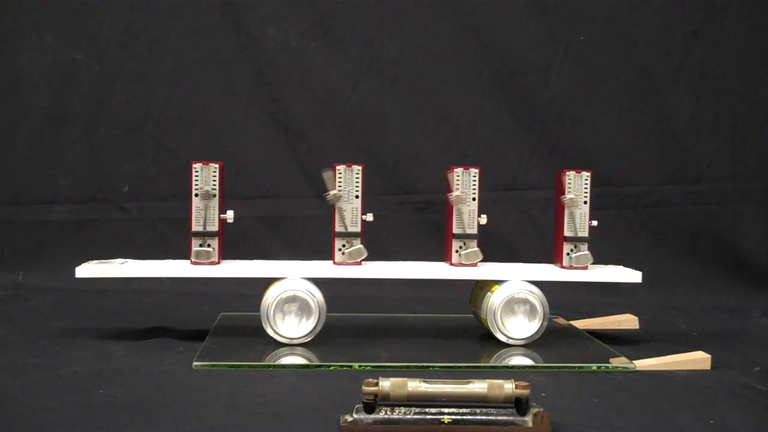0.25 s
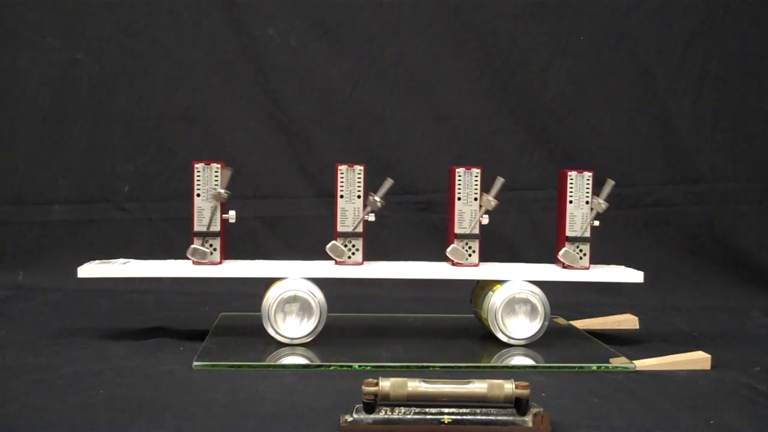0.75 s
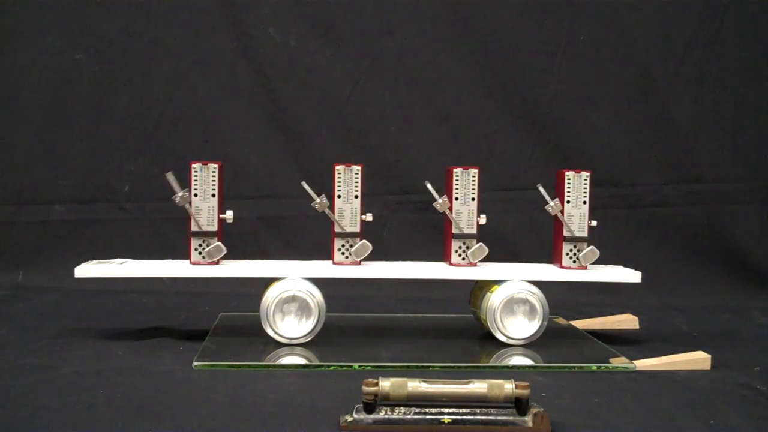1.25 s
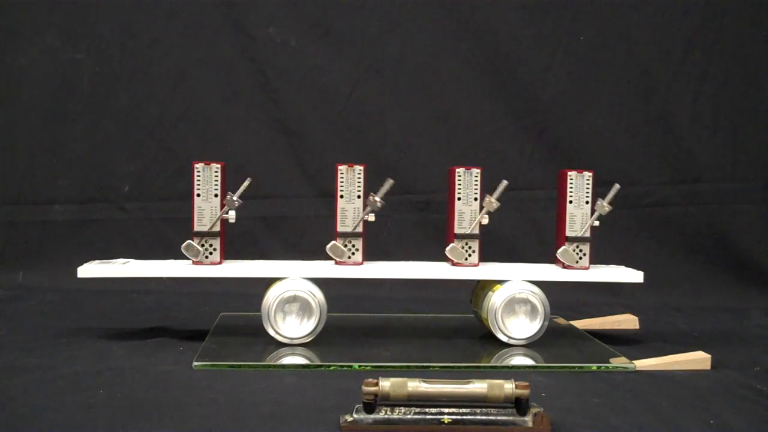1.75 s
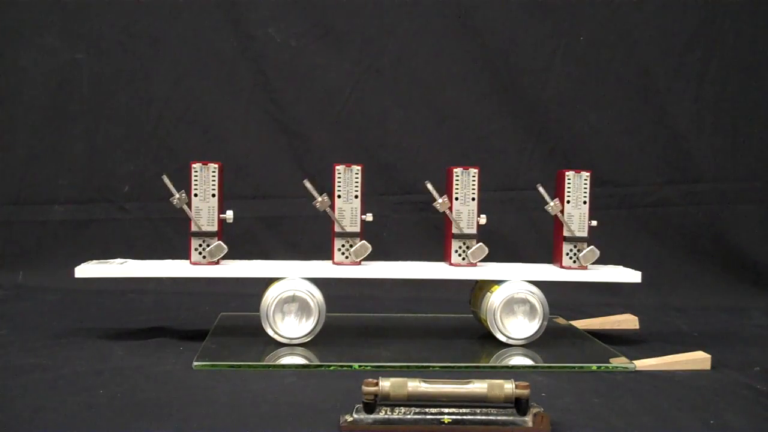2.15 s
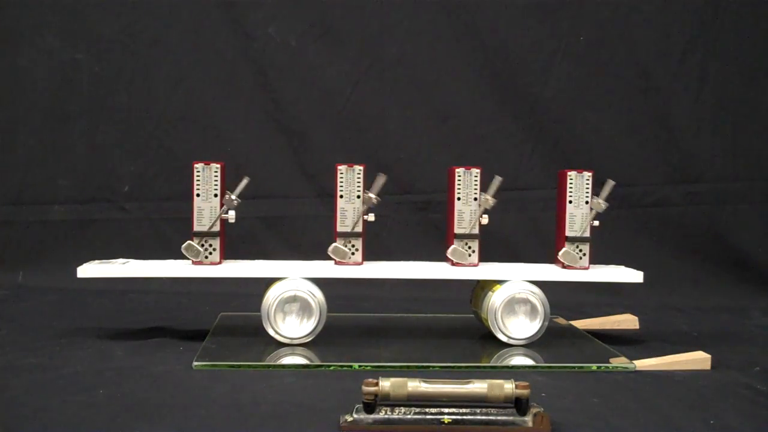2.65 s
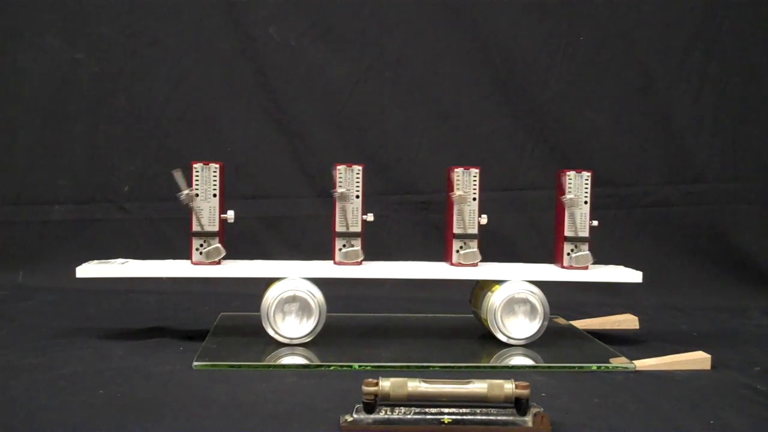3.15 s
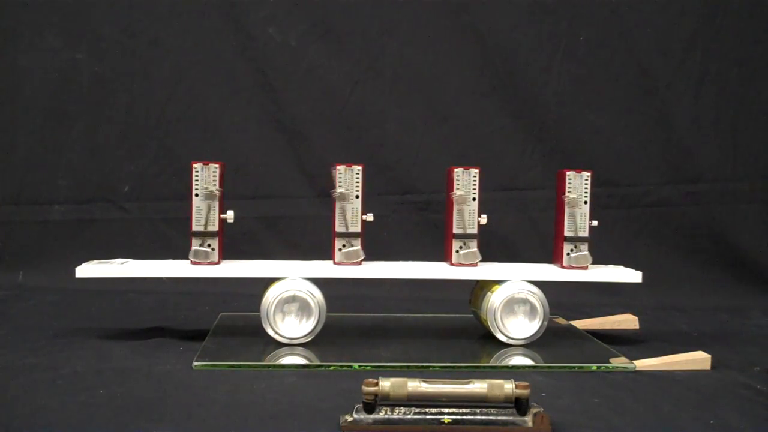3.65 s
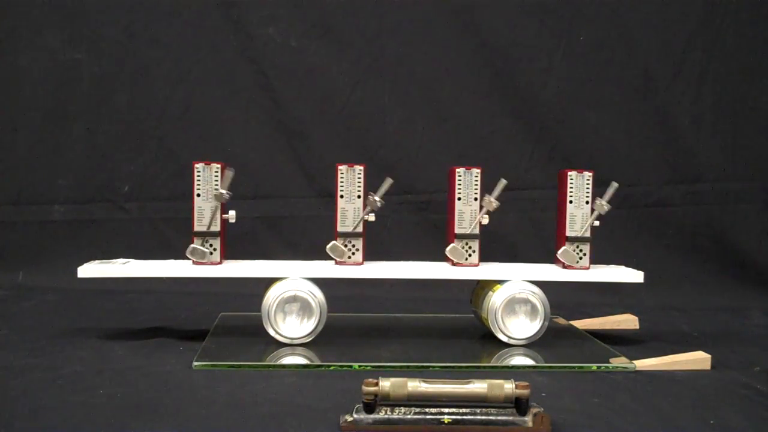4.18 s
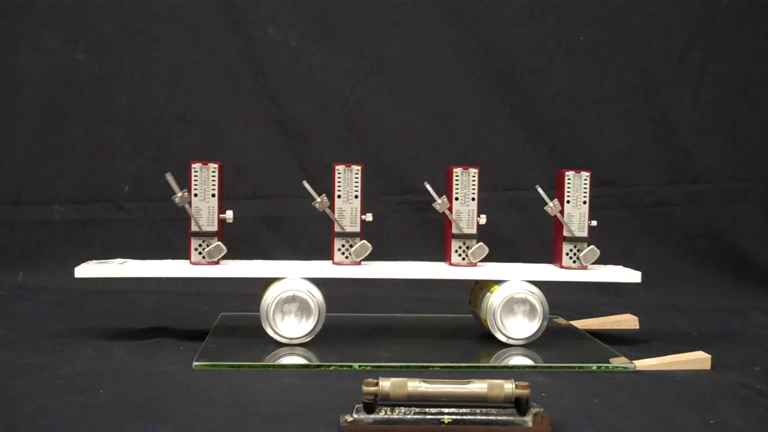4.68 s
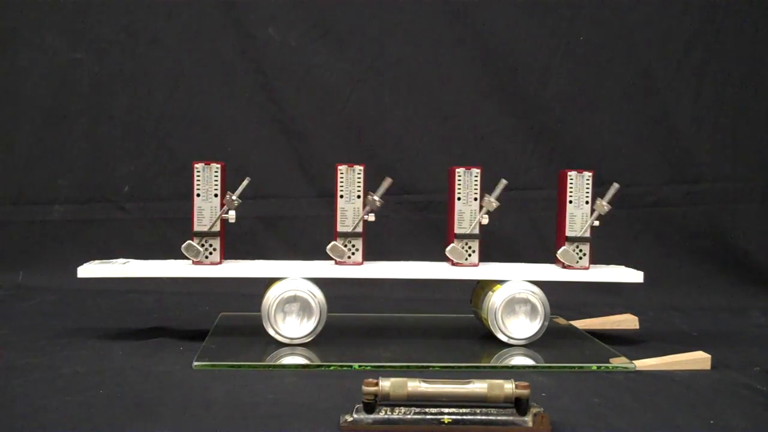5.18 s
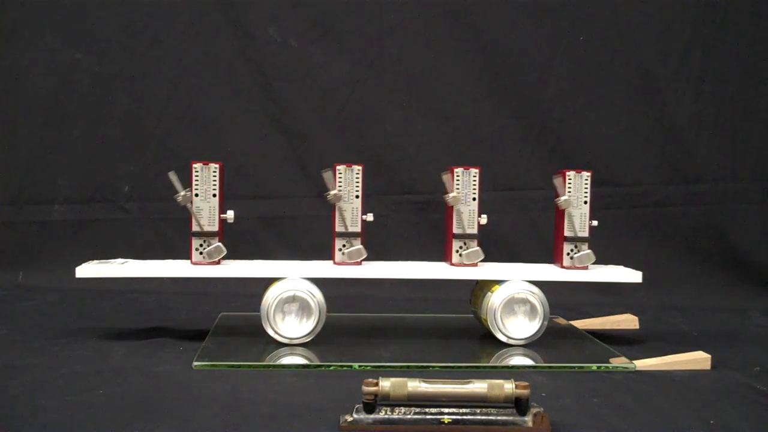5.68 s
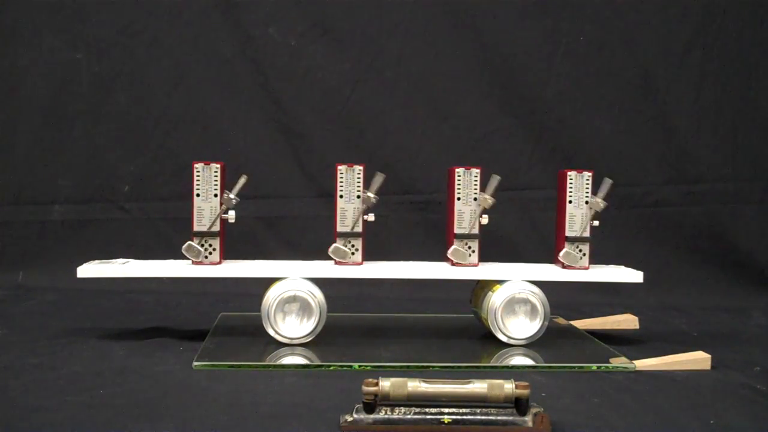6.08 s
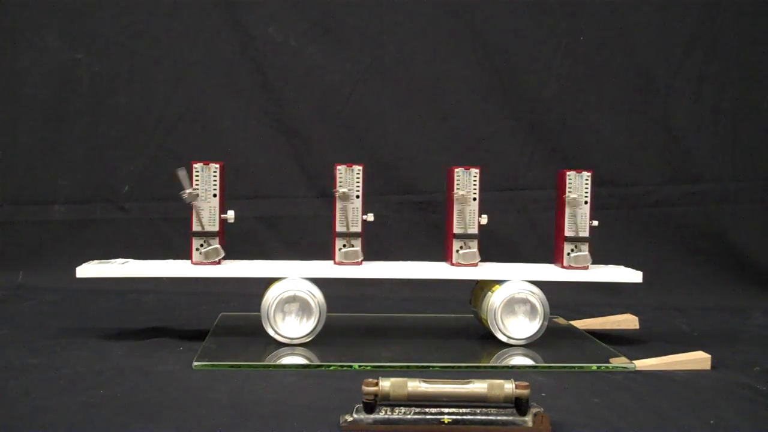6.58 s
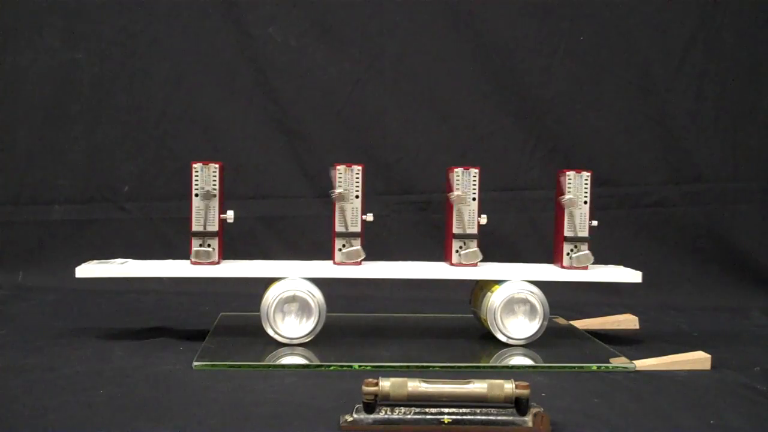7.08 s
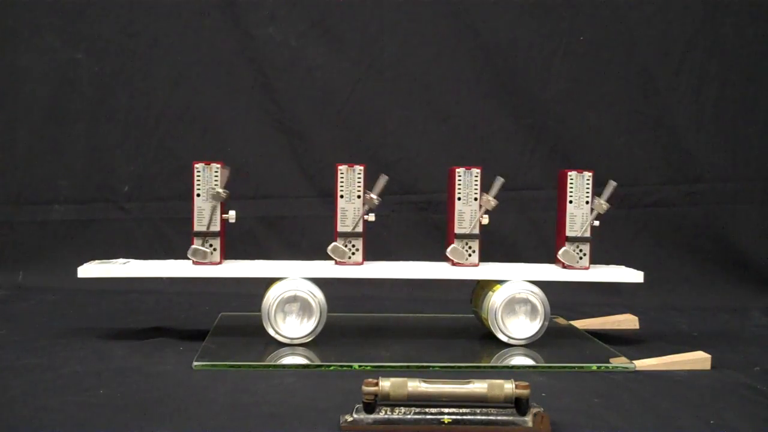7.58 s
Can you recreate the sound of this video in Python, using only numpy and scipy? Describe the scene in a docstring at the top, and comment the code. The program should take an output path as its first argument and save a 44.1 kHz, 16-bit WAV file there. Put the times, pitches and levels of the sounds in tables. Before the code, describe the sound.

Four small clockwork metronomes tick almost in unison, hard bright overloaded clacks in tight clusters, over faint fan hum in a quiet room.

```python
"""Four small clockwork metronomes tick almost together on one board: three in a bunch, one lagging.
Each escapement blow rings the modes of a hollow plastic case with a dry crack; noise bands make the room's
short tail. Behind them lie shaped air noise and two drifting fan whines that beat.
The microphone pair overloads: both channels clip, and the left one pops inside the loudest ticks."""
import sys
import numpy as np
from scipy import signal
from scipy.fft import rfft, irfft
from scipy.io import wavfile
from scipy.ndimage import uniform_filter1d

SR = 44100
rng = np.random.default_rng(int(sys.argv[2]) if len(sys.argv) > 2 else 0)


def transcribe(signal):
    """Save signal, clipped to [-1, 1], as a 16-bit WAV file at the path in sys.argv[1]."""
    frames = np.atleast_2d(signal).T
    limited = np.clip(frames, -1, 1)
    pcm = np.round(limited * 32767).astype(np.int16)
    wavfile.write(sys.argv[1], SR, pcm)


N = 345294
LEAD = SR // 4  # samples of run-up ahead of the scene


def metronomes():
    """The rolling board pulls the pendulums into step, so beat times bend smoothly from swing to swing."""
    # Two rows per metronome, tick and tock: [first swing t/s, fifth swing t/s, ninth swing t/s,
    # level/dB, left minus right level/dB, hollow knock level/dB, case pitch factor]
    clocks = [(0.3294, 3.7597, 7.182, 1.5, 2, 0, 1.01), (0.7539, 4.1857, 7.6118, 1, 1, 0, 1.02),
              (0.3440, 3.7584, 7.1775, 1.5, -1, 0, 0.99), (0.7788, 4.1968, 7.617, 0.5, -4, -2, 0.98),
              (0.3592, 3.7687, 7.1846, -4, 0, -1, 1.03), (0.7825, 4.1958, 7.611, -3, 2, -1, 1.01),
              (0.4207, 3.8426, 7.2542, -0.7, 1, -3, 0.99), (0.8342, 4.2568, 7.6752, -2, 1.3, -3, 1.01)]
    # Swing numbers of the three given times, counted from 0 [swing]
    known_swings = (0, 4, 8)
    wobble_s, uneven_db = .0003, .7  # tooth-to-tooth spread in time and strength
    out = np.zeros((3, N + 2 * LEAD))
    # begin one swing early: the tail of a beat just gone still hangs in the room
    swings = np.arange(-1, known_swings[-1] + 1)
    for *times, level_db, pan_db, knock_db, pitch in clocks:
        beats = np.polyval(np.polyfit(known_swings, times, 2), swings)
        for beat_s in beats[beats > -LEAD / SR]:
            late, strong = rng.standard_normal(2)
            row_db = level_db + uneven_db * strong + pan_db * np.array([[.5], [-.5], [0]])
            one = tick(knock_db, pitch) * undb(row_db)
            at = LEAD + int((beat_s + wobble_s * late) * SR)
            out[:, at:at + one.shape[1]] += one
    return out


def tick(knock_db, pitch):
    """Each contact rings decaying case modes with a crack; rows: left, right, to the walls; left peak 1."""
    # Case and clockwork modes, before pitch factor and detuning: [f/Hz, level/dB]
    case_modes = [(1250, -12.5), (1850, -9), (2200, -9), (2650, -10), (3050, -10), (3720, -9), (4200, -14),
                  (4900, -7), (5300, -7.5), (5700, -8.5), (6100, -3.5), (6500, -6), (6900, -2), (7400, -1),
                  (8000, -4), (8500, -5), (8900, -8.5), (9600, -11.5), (11000, -23), (13600, -29)]
    # Contacts and first echoes inside one tick: [delay t/s, left level/dB, right level/dB]
    blows = [(0, 0, -1), (.00115, 0, 0), (.0033, -10, -12), (.0048, -13, -5), (.0068, -16, -16)]
    hollow_hz, hollow_t60_s, clockwork_t60_s = 2400, .016, .01  # hollow knock lies below hollow_hz
    crack_db, crack_decay_s, contact_s = -2., .0016, .00007  # contact_s softens the onset
    scatter_db, detune = 3., .02  # chance in mode level and, as a fraction, in mode pitch
    small_hz = 1264  # so small a case radiates no bass

    hz, db = np.transpose(case_modes)[:, :, None]
    hollow = hz < hollow_hz
    db = db + knock_db * hollow
    t60 = np.where(hollow, hollow_t60_s, clockwork_t60_s)
    t = np.arange(SR // 25) / SR
    decay = np.exp(-np.log(1000) * t / t60)
    colour = case_modes + [(15000, -55)]
    out = np.zeros((3, len(t) + SR // 50))
    detuned = pitch * hz * (1 + detune * rng.standard_normal(hz.shape))
    sign = (-1) ** np.arange(len(hz))[:, None]  # neighbouring modes swing opposite ways
    for delay_s, left_db, right_db in blows:
        size = sign * undb(db + scatter_db * rng.standard_normal(hz.shape))
        ring = (size * decay * np.sin(2 * np.pi * detuned * t)).sum(axis=0)
        crack = undb(crack_db) * np.exp(-t / crack_decay_s) * shaped(len(t), colour)
        blow = (ring + crack) * (1 - np.exp(-t / contact_s))
        at = int(delay_s * SR)
        out[:2, at:at + len(t)] += undb([[left_db], [right_db]]) * blow
    # summed over all directions the modes blur: the walls get one click of their broad colour
    impulse = np.eye(1, out.shape[1])[0]
    out[2] = port(impulse, colour) * np.abs(out[0]).max()
    out = signal.sosfilt(signal.butter(6, small_hz, "high", fs=SR, output="sos"), out)
    return out / np.abs(out[0]).max()


def linger(click):
    """Twelve close resonances, rung by every tick, hang on as one rough narrow ring."""
    centre_hz, width_hz, level_db, t60_s = 1870, 70, -33, 0.54
    t = np.arange(SR // 2) / SR
    hz = centre_hz + width_hz * rng.standard_normal((12, 1))
    cluster = np.sin(2 * np.pi * hz * t).sum(axis=0) / np.sqrt(len(hz))
    ring = np.exp(-np.log(1000) * t / t60_s) * cluster
    return undb(level_db) * signal.fftconvolve(click, ring)[:len(click)]


def room(dry):
    """Dense echoes build up once the walls are reached and die band by band, unlike at the two ports."""
    # Room tail bands: [f/Hz, 60 dB decay t/s, level/dB]
    tail_bands = [(1080, 0.17, -18), (1930, 0.44, -21.5), (4070, 0.44, -24.5), (6480, 0.39, -27),
                  (8340, 0.12, -57), (11700, 0.096, -35), (14000, .18, -49)]
    gap_s = 0.003  # time scale of the build-up
    t = np.arange(int(.7 * SR)) / SR
    build_up = 1 - np.exp(-(t / gap_s) ** 2)
    wet = []
    for near in dry:
        tail = 0
        for k, (hz, t60, db) in enumerate(tail_bands):
            # noise that peaks at its own band and falls 14 dB by the next
            points = [(row[0], 0 if j == k else -14) for j, row in enumerate(tail_bands)]
            tail = tail + undb(db) * shaped(len(t), points) * np.exp(-np.log(1000) * t / t60)
        wet.append(signal.fftconvolve(near, tail * build_up)[:len(near)])
    return np.array(wet)


def whines():
    """Two fans a few hertz apart: each tone and its octave drift and waver, and together they beat."""
    # Fan pitch over time: [t/s, first fan f/Hz, second fan f/Hz]
    fan_pitch = [(0.45, 682.28, 689.44), (0.95, 682.15, 689.66), (1.45, 681.57, 689.81),
                 (1.95, 681.32, 690.06), (2.45, 681.41, 689.93), (2.95, 681.7, 690.27),
                 (3.45, 681.83, 689.93), (3.95, 682.15, 690.06), (4.45, 682.6, 689.92),
                 (4.95, 682.52, 689.43), (5.45, 682.49, 689.27), (5.95, 682.59, 689.45),
                 (6.45, 682.44, 689.24), (6.95, 682.11, 688.82), (7.45, 681.85, 689.83)]
    tone_db, octave_db = (-51.7, -56.5), (-68., -60.)  # rms per fan, around which the level wavers
    waver_db = .7  # multiplies the slow walk
    in_step_s = .21  # a moment when the two whines add up
    s, *fans = np.transpose(fan_pitch)
    t = np.arange(N) / SR
    out = 0
    for hz, low_db, high_db in zip(fans, tone_db, octave_db):
        phase = 2 * np.pi * np.cumsum(np.interp(t, s, hz)) / SR
        phase = phase - phase[int(in_step_s * SR)]
        tone = undb(low_db + waver_db * walk(3.23)) * np.cos(phase)
        octave = undb(high_db + 2 * waver_db * walk(4.1)) * np.cos(2 * phase)
        out = out + tone + octave
    return np.sqrt(2) * out  # rms to peak


def air():
    """Ventilation rumble, largely alike at both ports, under microphone hiss that is not."""
    # Spectrum of the air noise: [f/Hz, relative density level/dB]
    air_colour = [(25, -22), (60, -10), (110, -8.5), (250, -6.5), (400, 1.5), (550, -4), (800, 1.5),
                  (1000, -5.5), (1900, -5.5), (3000, -13.5), (4500, -16.5), (6300, -14), (7800, -18),
                  (10000, -28), (14000, -28)]
    level_db, alike_hz = -47.5, 1610  # likeness of the ports halves at alike_hz
    mid, side = shaped(N, air_colour), shaped(N, air_colour)
    f = np.fft.rfftfreq(N, 1 / SR)
    # the deepest bass is less alike too
    alike = .93 / (1 + (f / alike_hz) ** 2) * np.clip(f / 110, .4, 1)
    mid = irfft(rfft(mid) * np.sqrt(1 + alike), N)
    side = irfft(rfft(side) * np.sqrt(1 - alike), N)
    return undb(level_db + 0.2 * walk(1.92)) * np.array([mid + side, mid - side]) / np.sqrt(2)


def port(x, points):
    """Causal minimum-phase filter with the gain of (Hz, dB) points, from the folded cepstrum."""
    hz, db = np.transpose(points)
    f = np.maximum(np.fft.rfftfreq(1024, 1 / SR), 1)
    cepstrum = irfft(np.log(undb(np.interp(np.log(f), np.log(hz), db))))
    # fold the second half onto the first
    cepstrum[1:512], cepstrum[513:] = 2 * cepstrum[1:512], 0
    return signal.fftconvolve(x, irfft(np.exp(rfft(cepstrum))))[:len(x)]


def shaped(size, points):
    """Noise with a spectrum of (Hz, dB) points, joined along log frequency, rms 1."""
    hz, db = np.transpose(points)
    f = np.maximum(np.fft.rfftfreq(size, 1 / SR), 1)
    gain = undb(np.interp(np.log(f), np.log(hz), db))
    x = irfft(rfft(rng.standard_normal(size)) * gain, size)
    return x / x.std()


def walk(rate):
    """Slow chance: random steps, rate per second, smoothed twice to a spread of about 0.7."""
    k = int(SR / rate)
    steps = np.repeat(rng.standard_normal(N // k + 1), k)
    return 0.98 * uniform_filter1d(uniform_filter1d(steps, k), k)[:N]


def undb(db):
    """Amplitude gain of a level in dB."""
    return 10 ** (np.asarray(db) / 20)


def scene():
    """Ticks with their ring and room as each port hears them, over fans and air."""
    # The cavity of the right port rings near 6 kHz and shades the treble: [f/Hz, level/dB]
    right_port = [(3000, 0), (4500, 2), (5600, 6), (6300, 5), (7000, -10), (8000, -17), (9000, -11),
                  (10500, -10), (14000, -21)]
    right_early = 2  # samples by which the right channel is moved earlier
    ticks = metronomes()
    to_walls = ticks[2]
    heard = ticks[:2] + linger(to_walls) + room(ticks[[2, 2]])
    left, right = heard[:, LEAD:LEAD + N]
    right = np.roll(port(right, right_port), -right_early)
    return np.array([left, right]) + whines() + air()


def record(dry):
    """Both channels clip; at each pop the top left samples drop by the whole range: a thump and a spit."""
    # Pops of the left channel: [t/s, count of highest samples that drop]
    pops = [(0.3306, 2), (0.3449, 1), (0.7552, 2), (0.781, 1), (1.1997, 1), (1.2782, 2), (1.6334, 4),
            (2.0516, 2), (2.4717, 2), (2.4901, 2), (3.3295, 2), (3.3424, 5), (3.7595, 3), (4.1866, 2),
            (4.1977, 1), (4.6166, 3), (5.0448, 2), (5.0527, 3), (5.468, 1), (5.4753, 1), (6.3237, 2),
            (6.3287, 1), (6.7577, 2), (6.7622, 3), (7.1788, 1), (7.6133, 1), (7.6181, 2)]
    hiss_top_hz, top_hz = 14000, 15500  # low-pass edges before and after the second clip
    wet = np.clip(dry, -1, 1)
    reach = SR // 1200  # samples searched to each side of a pop
    for s, count in pops:
        start = int(s * SR) - reach
        highest = np.argsort(dry[0, start:start + 2 * reach])[-int(count):]
        wet[0, start + highest] -= 2
    wet = signal.sosfilt(signal.ellip(6, .3, 42, hiss_top_hz, fs=SR, output="sos"), wet)
    return signal.sosfilt(signal.ellip(8, .2, 60, top_hz, fs=SR, output="sos"), np.clip(wet, -1, 1))


dry = scene()
out = record(dry)
transcribe(out)
```